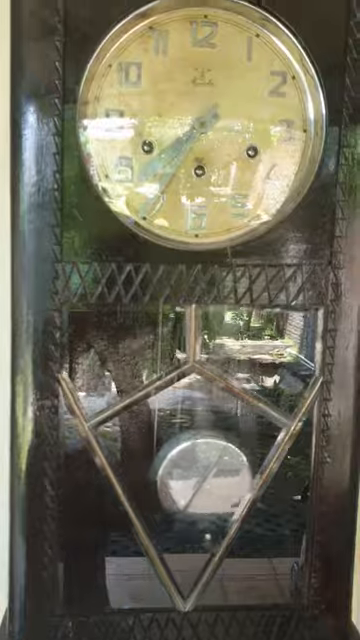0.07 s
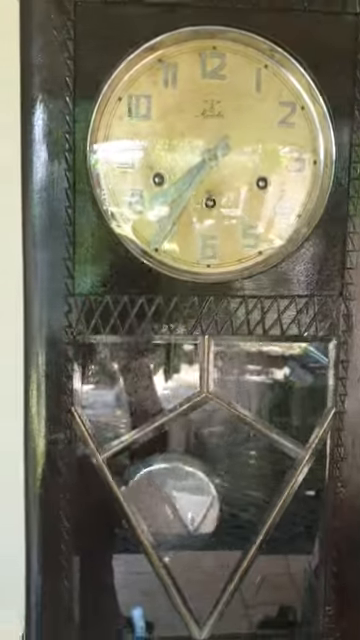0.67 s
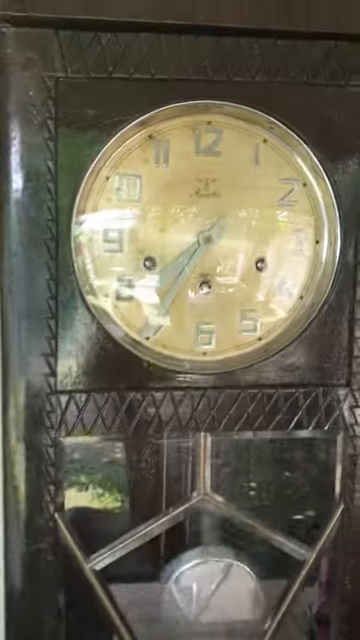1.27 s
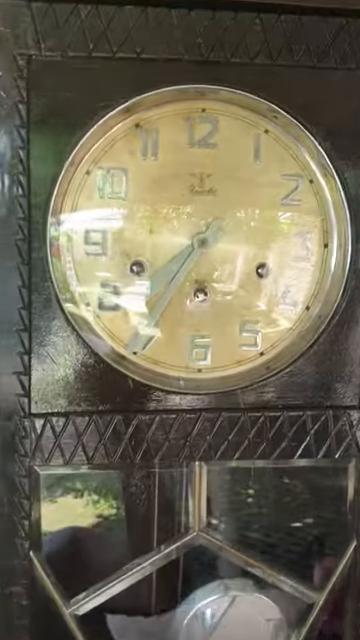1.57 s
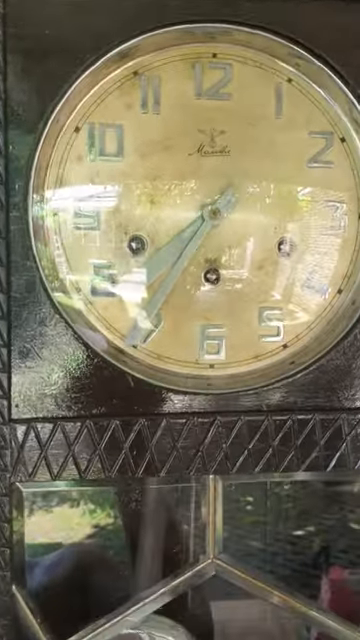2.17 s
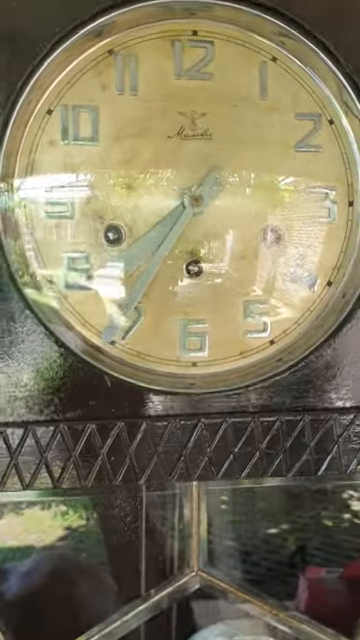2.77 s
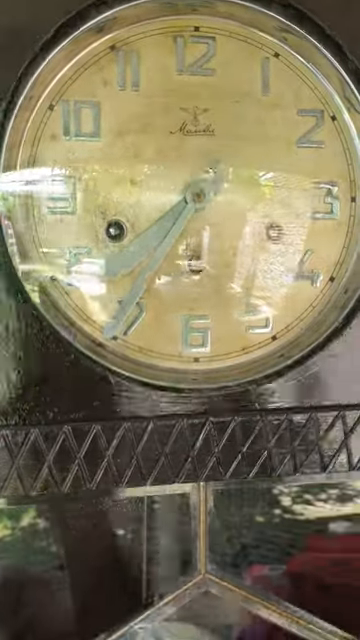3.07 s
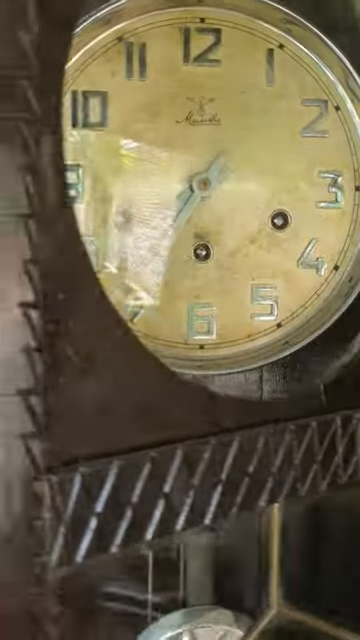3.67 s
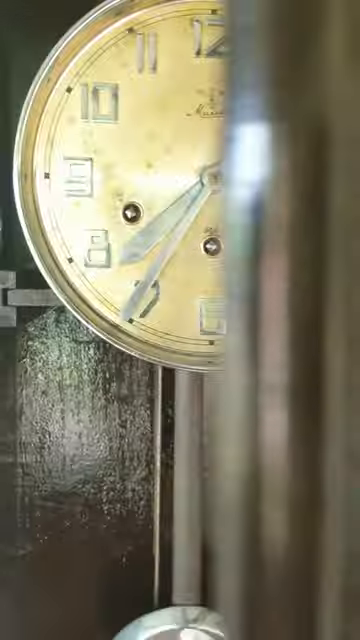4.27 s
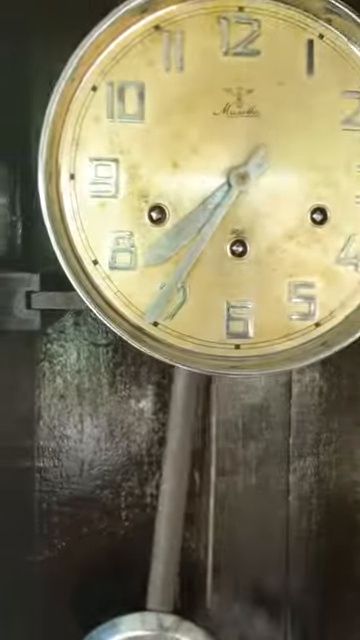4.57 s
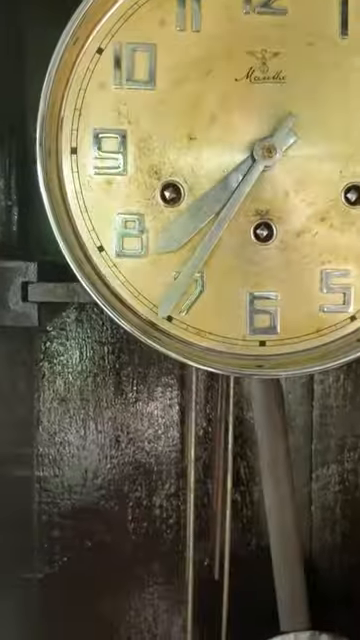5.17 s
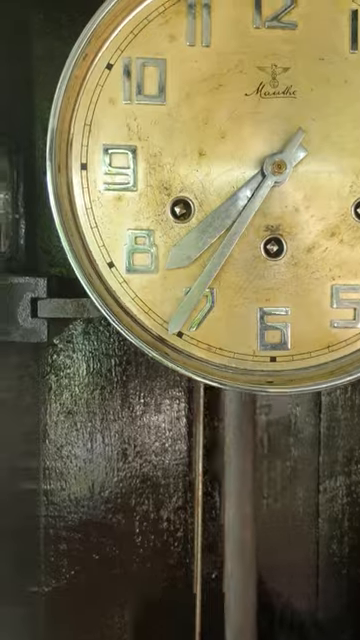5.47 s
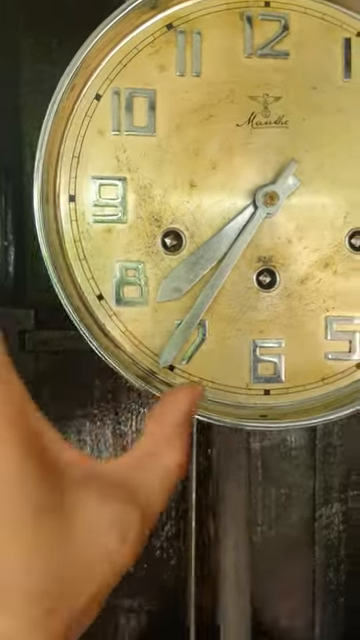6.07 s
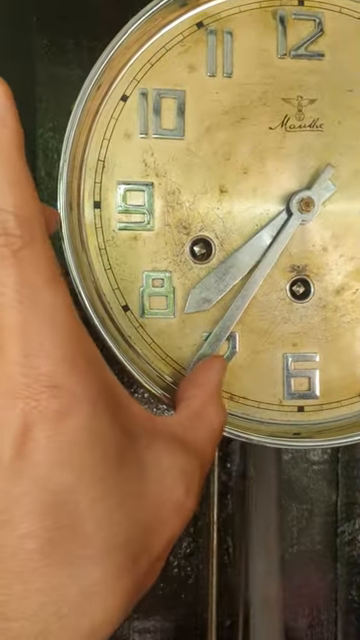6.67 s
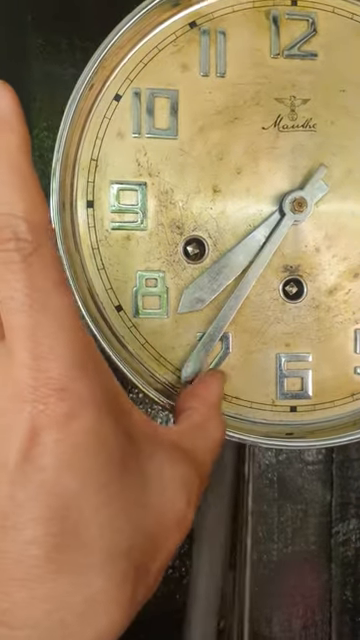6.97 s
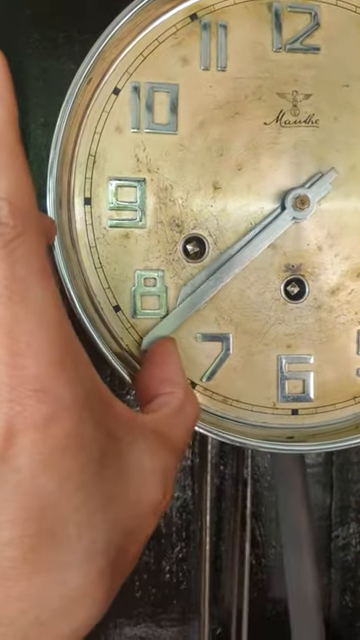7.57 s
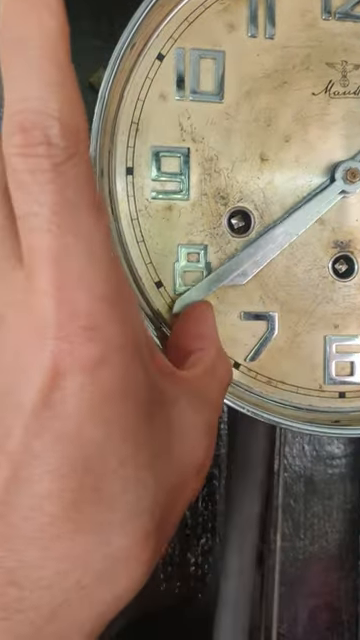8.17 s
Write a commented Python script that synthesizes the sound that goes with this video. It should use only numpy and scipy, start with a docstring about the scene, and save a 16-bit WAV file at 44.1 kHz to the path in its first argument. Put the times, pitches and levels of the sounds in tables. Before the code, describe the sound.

A wooden pendulum wall clock ticks close by throughout, about one beat every 0.6 seconds, alternating tick and tock with a short brassy ring. Beneath it lie a quiet room's low rumble, hum, hiss and a few very faint squeaks. At first the ticks are soft and muffled by the shut case, with small handling clicks and a light brush around 0.6 to 1.2 seconds. From 2.5 to 3.2 seconds the tight glass door is tugged, its wood juddering, scraping and groaning slightly upward in pitch. At about 3.5 seconds it springs free with a quick rattling clack, the loudest sound. From 4 seconds the ticks are open, clearer and louder. From about 7 seconds a hand softly brushes the dial and the case rumbles faintly; a strong tick near 7.5 seconds leaves a thin metallic ring. Ticking and soft rubs continue until about 8.4 seconds.

```python
"""Wooden pendulum wall clock

The escapement ticks in a quiet room, over low rumble, hum, hiss and faint squeaks. The tight glass door
is pulled, sticks and slips along its frame and springs free with a rattling clack; the muffled ticks
then sound open and clear. A hand brushes the dial and pushes the minute hand: the case rumbles and the
loaded wheel train rings."""
import sys
import numpy as np
from scipy import signal
from scipy.fft import rfft, irfft, next_fast_len
from scipy.io import wavfile
from scipy.ndimage import map_coordinates

SR = 44100
rng = np.random.default_rng(int(sys.argv[2]) if len(sys.argv) > 2 else 0)


def int16_out(signal):
    """Quantize to a 16-bit WAV file."""
    q = np.round(np.clip(np.atleast_2d(signal).T, -1, 1) * 32767)
    wavfile.write(sys.argv[1], SR, q.astype(np.int16))


N = 370881
TIME_S = np.arange(N) / SR
EVENT_N = SR * 3 // 4
EVENT_S = np.arange(EVENT_N) / SR
OPEN_S, CROSS_S = 4.1, 6.5  # door stands open; microphone crosses in front of the movement
TICK_PAN_DB = 2.5


def amp(db):
    return 10 ** (np.asarray(db) / 20)


def unit_rms(x):
    return x / np.sqrt(np.mean(x ** 2) + 1e-20)


def along(points, hz):
    """Interpolate (Hz, value) points on a log frequency axis."""
    knots_hz, values = np.transpose(points)
    return np.interp(np.log(hz + 1), np.log(knots_hz + 1), values)


def filtered(x, response):
    """Apply a gain given as a function of Hz."""
    n = x.shape[-1]
    padded = next_fast_len(n + 8192)
    return irfft(rfft(x, padded) * response(np.fft.rfftfreq(padded, 1 / SR)), padded)[..., :n]


def panned(db):
    """Stereo gains for a left-minus-right level."""
    return amp(np.array([[.5], [-.5]]) * db)


def placed(x, pan_db, lead_s):
    """Off-centre source: the left leads by about lead_s in the treble; bass leaves the case at once."""
    def response(hz):
        delay_s = lead_s * along([(600, 0.072), (1300, 0.94)], hz)
        return panned(pan_db(hz)) * np.exp(np.array([[1j], [-1j]]) * np.pi * hz * delay_s)
    return filtered(x, response)


def wobble(rate_hz):
    """Smooth random curve."""
    knots = rng.standard_normal(int(N * rate_hz / SR) + 4)
    return map_coordinates(knots, [TIME_S * rate_hz])


# Left-right likeness: (frequency [Hz], correlation [ratio])
COHERENCE = [(60, 0.9), (250, 0.89), (600, 0.57), (2000, 0.07), (10000, 0.44)]


def noise(spectrum, size=EVENT_N):
    """Coloured stereo noise of rms 1, near mono in the bass."""
    def colour(hz):
        angle = np.arccos(np.clip(along(COHERENCE, hz), -1, 1)) / 2
        return amp(along(spectrum, hz)) * np.array([np.cos(angle), np.sin(angle)])
    mid, side = filtered(rng.standard_normal((2, size)), colour)
    return unit_rms(np.array([mid + side, mid - side]))


def band(hz, octaves, size=EVENT_N):
    """Noise in one resonance, 14 dB down at +/- octaves."""
    skirt = [(-4, -60), (-1, -14), (0, 0), (1, -14), (4, -60)]
    return noise([(hz * 2 ** (step * octaves), db) for step, db in skirt], size)


def fade(t60_s):
    return amp(-60 * EVENT_S / t60_s)


def attack(rise_s):
    return 1 - np.exp(-EVENT_S / rise_s)


def ring(hz, db, t60_s, scatter_db, spread_rad, twin_db, split_hz):
    """Damped modes, each beating with a weak twin; higher ones differ more in phase left to right."""
    gains = amp(db + scatter_db * rng.standard_normal(len(hz)))
    phase = spread_rad * np.minimum(hz / 1500, 1) * rng.standard_normal((2, len(hz)))
    twin_hz = hz + split_hz * np.sqrt(hz / 1000) * rng.standard_normal(len(hz))
    modes = np.exp(2j * np.pi * hz[:, None] * EVENT_S)
    twins = 1j * amp(twin_db) * np.exp(2j * np.pi * twin_hz[:, None] * EVENT_S)
    waves = (modes + twins) * np.array([fade(t) for t in t60_s])
    return ((gains * np.exp(1j * phase)) @ waves).imag / np.sqrt(np.sum(gains ** 2) / 2)


def add(track, start_s, sound):
    start = max(round(start_s * SR), 0)
    part = track[:, start:start + sound.shape[-1]]
    part += sound[:, :part.shape[-1]]


# Room decay: (frequency [Hz], t60 [s])
ROOM_DECAY = [(120, 1), (400, 0.37), (1400, 0.43), (5000, 0.4), (12000, 0.3)]


def in_room(x, wet_db):
    """Add a diffuse tail, longest in the bass."""
    hz, t, bins = signal.stft(rng.standard_normal((2, EVENT_N)), SR, nperseg=256)
    decay = amp(-60 * t / along(ROOM_DECAY, hz)[:, None])
    tail = signal.istft(bins * decay, SR, nperseg=256)[1]
    wet = signal.fftconvolve(x, tail / np.linalg.norm(tail[0]), axes=1)
    return x + amp(wet_db) * wet[:, :x.shape[-1]]


# Room floor, low room resonance, microphone hiss: (frequency [Hz], density [dB])
AIR_SPECTRUM = [(20, -31), (60, -11), (120, 0), (200, -2), (330, -5), (480, -6.5), (620, -17.5),
                (1000, -22), (1600, -36), (5000, -45), (15000, -46)]
BOOM_SPECTRUM = [(20, -41), (38, -16), (60, -0.5), (80, -3.5), (100, -9), (200, -39), (600, -79.5)]
HISS_SPECTRUM = [(600, -4.5), (1500, 5), (4000, -0.5), (6800, 1.5), (8400, -13), (11000, 0.5), (14500, -3)]


def room_tone(air_db=-68, rumble_db=-66, hum_db=-72.5, hum_hz=299.8, hiss_db=-77):
    """Randomly swelling rumble, wavering hum and steady hiss."""
    drift_db = wobble(1.5) + wobble(5)
    air = amp(air_db + drift_db) * noise(AIR_SPECTRUM, N)
    rumble = amp(rumble_db + 3 * wobble(4)) * noise(BOOM_SPECTRUM, N)
    hum_rms = amp(hum_db + 2.5 * wobble(5))
    hum = hum_rms * np.sqrt(2) * np.sin(2 * np.pi * hum_hz * TIME_S + .4 * wobble(5))
    hiss = unit_rms(filtered(rng.standard_normal((2, N)), lambda hz: amp(along(HISS_SPECTRUM, hz))))
    pan_db = np.interp(TIME_S, [OPEN_S, CROSS_S], [7.5, 6.5])  # microphone nears the dial
    return (air + rumble + hum) * panned(pan_db) + amp(hiss_db) * hiss * panned(1.5)


# Beats, uneven from tooth to tooth: (time [s], level [dB], treble [dB])
PALLET_BEATS = [(0.159, -48.5, -6), (0.758, -57, 8), (1.376, -49, 3.5), (1.975, -54.5, 5.5),
                (2.599, -45, -5), (3.197, -42.5, 0), (3.816, -39.5, 2.5), (4.419, -43.5, -3),
                (5.047, -36, -6), (5.613, -42.5, 3), (6.247, -37, -2.5), (6.839, -41.5, 4),
                (7.466, -33, 6.5), (8.062, -41, 2)]
# Brass movement: (frequency [Hz], first pallet [dB], second pallet [dB], t60 [s])
MOVEMENT_MODES = [(478, -11, -5, 0.275), (592, -11, -8, 0.3), (855, -3.5, -15, 0.18),
                  (924, -1.5, -24, 0.17), (962, -4.5, -2.5, 0.2), (989, 0.5, -4, 0.2),
                  (1110, -5, -7.5, 0.3), (1179, -8, -7, 0.35), (1200, -5, -11, .24), (1310, -10, -24, 0.17),
                  (1388, 8, -22, 0.041), (1437, -16, 0.5, 0.22), (1700, -2.5, -7, 0.31),
                  (1758, -1.5, 1.5, 0.24), (1835, -4, -7.5, 0.22), (1953, -3, -19, 0.087),
                  (2117, -1.5, -9.5, 0.24), (2360, -26, -7.5, 0.37), (2624, -5, -14.5, 0.19),
                  (2690, -9, -14, 0.23), (2790, -16, -18, 0.23), (3203, -14, -14, 0.28),
                  (3350, -24, -15, 0.082), (3740, -16, -5, 0.13), (3825, -11, 2, 0.18),
                  (3880, -8, -4.5, 0.18), (4970, -3, -2.5, 0.077), (5000, -15, -7, 0.11),
                  (5380, -28, -8, 0.055), (6970, -7, -8.5, 0.1)]
# Dense case ring under each pallet: (frequency [Hz], density [dB])
TICK_SPECTRUM = [(240, -67), (400, -32), (567, 2), (768, -14.5), (979, 4), (1070, -5.5), (1690, -3),
                 (2290, -11), (3290, -7.5), (4600, -22), (4960, -18.5), (8430, -30), (11100, -25.5),
                 (15000, -35)]
TOCK_SPECTRUM = [(240, -46.5), (400, -13.5), (584, -2), (745, -20), (979, -8), (1290, -15.5), (1470, -15),
                 (1910, -10.5), (2510, -14), (3050, -25), (3830, -9), (4260, -30), (5430, -14),
                 (15000, -75)]
# Treble shelf: (frequency [Hz], share of treble gain [ratio])
TREBLE_SHELF = [(1800, 0.18), (6000, 1)]
# Boxy colour of the shut case: (frequency [Hz], gain [dB])
SHUT_RESPONSE = [(1200, -2), (1880, 2), (2450, -1.5), (3100, -5.5), (3900, -7.5), (4900, -2.5)]


def escapement(hold_s=0.018, case_t60_s=0.054, brass_db=-7, case_db=-14, snap_db=-13, shut_treble_db=-7):
    """The wheel drops on each pallet in turn, ringing movement and case; the shut door dulls it."""
    out = np.zeros((2, N))
    hz, first_db, second_db, t60_s = np.transpose(MOVEMENT_MODES)
    case_envelope = np.minimum(1, fade(case_t60_s) * amp(60 * hold_s / case_t60_s)) * attack(0.0011)
    for k, (start_s, db, treble_db) in enumerate(PALLET_BEATS):
        modes_db, spectrum = (second_db, TOCK_SPECTRUM) if k % 2 else (first_db, TICK_SPECTRUM)
        brass = ring(hz, modes_db, t60_s, scatter_db=1, spread_rad=.6, twin_db=-11, split_hz=10)
        case = in_room(noise(spectrum) * case_envelope, wet_db=-6.5)
        snap = band(hz=3000, octaves=1.13) * fade(0.0093)  # tooth meets steel
        beat = amp(brass_db) * brass * attack(0.0069) + amp(case_db) * case + amp(snap_db) * snap
        shut = start_s < OPEN_S
        shelf_db = treble_db + shut * shut_treble_db
        beat = filtered(beat, lambda f: amp(shelf_db * along(TREBLE_SHELF, f)
                                            + shut * along(SHUT_RESPONSE, f)))
        lead_s = -.00027 if start_s < CROSS_S else .00016
        add(out, start_s, amp(db) * placed(beat, lambda f: TICK_PAN_DB, lead_s))
    return out


# Squeaks: (centre [s], half-length [s], frequency [Hz], half-width [oct], level [dB])
FAINT_SQUEAKS = [(.33, 0.044, 6500, 0.064, -76.5), (0.929, 0.21, 3960, 0.13, -81.5),
                 (1.633, 0.14, 2390, 0.48, -78), (3.451, 0.14, 1080, 0.37, -68.5),
                 (4.633, 0.055, 1100, 0.16, -69), (4.675, 0.027, 1075, 0.18, -57.5),
                 (4.657, .08, 3770, .08, -79), (4.805, 0.086, 1935, 0.054, -79),
                 (5.466, 0.11, 3180, 0.054, -78.5), (5.753, 0.3, 6320, 0.033, -83),
                 (6.613, 0.21, 6230, 0.097, -78), (7.14, 0.16, 3190, 0.052, -81),
                 (7.338, 0.26, 6130, 0.12, -78), (7.366, .16, 3110, 0.06, -78)]


def squeaks():
    """Faint squeaks and far-off chirps: narrow noise bands that swell and fade."""
    out = np.zeros((2, N))
    for centre_s, half_s, hz, octaves, db in FAINT_SQUEAKS:
        swell = np.hanning(int(2 * half_s * SR)) ** 2
        add(out, centre_s - half_s, amp(db) * band(hz, octaves, len(swell)) * swell)
    return out


# Hand strokes: (time [s], length [s], swish [dB], thud [dB])
HAND_STROKES = [(0.845, 0.43, -78.5, -59.5), (1.013, 0.22, -65, -67.5), (4.802, 0.79, -95, -66),
                (6.886, 0.22, -66.5, -70), (7.726, 0.23, -63.5, -61), (8.159, 0.23, -60.5, -61),
                (8.23, 0.46, -83, -54)]
# Handling clicks: (time [s], level [dB], frequency [Hz], half-width [oct], t60 [s])
HAND_CLICKS = [(0.638, -56, 597, 1.2, 0.045), (0.653, -52, 2134, 0.87, 0.019),
               (3.327, -57, 2179, 0.41, 0.2), (5.341, -72.5, 5960, 2.24, 0.17)]
# Sliding skin, juddering wood panel: (frequency [Hz], density [dB])
SKIN_SPECTRUM = [(290, -49), (500, -0.5), (1390, -12), (1770, -7.5), (3510, -19.5), (6860, -19),
                 (14000, -32.5), (15000, -30)]
PANEL_SPECTRUM = [(24, -41.5), (40, -15), (65, -20), (96, -13), (146, 0), (247, -2.5), (285, -4), (318, -4),
                  (507, -14), (564, -24), (700, -15.5), (910, -34.5), (1540, -120)]


def handling(swish_pan_db=4.5, thud_pan_db=7.5):
    """Skin brushes case and dial with a swish and a soft thud, among a few small clicks."""
    out = np.zeros((2, N))
    for start_s, length_s, swish_db, thud_db in HAND_STROKES:
        swish = amp(swish_db) * noise(SKIN_SPECTRUM) * panned(swish_pan_db)
        thud = amp(thud_db) * noise(PANEL_SPECTRUM) * panned(thud_pan_db)
        age = 4 * EVENT_S / length_s
        envelope = np.sqrt(2 * age) * np.exp(.5 - age)
        add(out, start_s, (swish + thud) * envelope)
    for start_s, db, hz, octaves, t60_s in HAND_CLICKS:
        add(out, start_s, amp(db) * band(hz, octaves) * fade(t60_s))
    return out


# Pulls on the door: (time [s], length [s], swell [dB], judder [dB], scrape [dB], rasp [dB], groan [dB])
DOOR_PULLS = [(2.51, 0.052, 3.5, -53, -67, -78.5, -51.5), (2.597, 0.092, -4.5, -55.5, -70, -79, -68),
              (2.716, 0.18, -2.5, -51, -57, -65.5, -60), (2.789, 0.077, -1.5, -51, -61, -85, -52.5),
              (2.914, 0.017, 0, -48, -60.5, -84, -54), (2.958, 0.17, 9, -51.5, -56.5, -61, -57)]


def pull_gain(levels_db, effort_power=1, grip_s=0.024, release_db_per_s=174.5):
    """Envelope of one layer: each pull grips, swells or eases as the door slides, then lets go."""
    gain = np.zeros(N)
    for (start_s, length_s, swell_db, *_), db in zip(DOOR_PULLS, levels_db):
        t = np.maximum(TIME_S - start_s, 0)
        effort_db = swell_db * np.minimum(t / length_s, 1)
        effort_db -= release_db_per_s * np.maximum(t - length_s, 0)
        gain = np.hypot(gain, amp(db + effort_power * effort_db) * np.minimum(t / grip_s, 1))
    return gain


# Rubbing door edge: (frequency [Hz], level [dB], t60 [s])
EDGE_MODES = [(1370, -2.5, 0.049), (1743, -7, .025), (2250, -2.5, 0.025), (2560, 0, 0.03)]
# Scraping wood, dry varnish: (frequency [Hz], density [dB])
SCRAPE_SPECTRUM = [(290, -27.5), (500, 2), (568, -9.5), (637, -0.5), (1170, -9), (1330, -16), (1630, -5.5),
                   (3460, -8), (4600, -20), (7060, -16.5), (8990, -32), (11300, -20), (15000, -40)]
VARNISH_SPECTRUM = [(1800, -29.5), (3100, -6), (3430, 2), (3650, -4), (4500, -5), (5500, -2.5), (6900, -4),
                    (8600, -22), (11300, -12), (14500, -16.5)]


def door_drag(slips_per_s=650, edge_db=-3, rough_db=2.7):
    """Wood sticks and slips: the panel judders and booms, slips scrape and ring the edge, varnish rasps."""
    *_, judder_db, scrape_db, rasp_db, _ = np.transpose(DOOR_PULLS)
    slips = (rng.random(N) < slips_per_s / SR) * rng.uniform(-1.13, 1, N)

    def struck(body):
        return unit_rms(signal.fftconvolve(slips[None], body, axes=1)[:, :N])

    edge = ring(*np.transpose(EDGE_MODES), scatter_db=1, spread_rad=1, twin_db=-6, split_hz=60)
    grains = struck(noise(SCRAPE_SPECTRUM) * fade(0.014))
    scrape = unit_rms(noise(SCRAPE_SPECTRUM, N) + grains + amp(edge_db) * struck(edge))
    panel = amp(0.5) * noise(PANEL_SPECTRUM, N) + amp(-12) * noise(BOOM_SPECTRUM, N)
    rasp = unit_rms(noise(VARNISH_SPECTRUM, N) * amp(rough_db * wobble(90)))
    return (pull_gain(judder_db) * panel
            + pull_gain(scrape_db, effort_power=1.36) * scrape
            + pull_gain(rasp_db) * rasp)


def door_groan(slack_hz=155.1, taut_hz=261.7, waver_hz=7, rough_db=2):
    """The sticking panel shudders at a pitch that climbs with the strain, first pull to last."""
    start_s, length_s, *_, groan_db = np.transpose(DOOR_PULLS)
    strain = np.interp(TIME_S, [start_s[0], start_s[-1] + length_s[-1]], [0, 1]) ** 2.5
    pitch_hz = slack_hz + (taut_hz - slack_hz) * strain + waver_hz * wobble(60)
    tone = np.sqrt(2) * np.sin(2 * np.pi * np.cumsum(pitch_hz) / SR)
    return pull_gain(groan_db) * amp(rough_db * wobble(59)) * tone


# Blows of door and catch: (time [s], level [dB], wood [dB], metal [dB])
DOOR_BLOWS = [(3.505, -21, -6.5, 5), (3.508, -18, -3.5, 0), (3.548, -12.5, -2.5, -1.5),
              (3.5565, -12, -2.5, -7), (3.56, -13, -4, -11), (3.6105, -17.5, -9.5, 1),
              (3.622, -20.5, -1, -1.5)]
# Door with pane, steel catch: (frequency [Hz], level [dB], t60 [s])
DOOR_MODES = [(124, -21, 0.85), (260.8, -13, .36), (310, -11, 0.4), (490.4, 3, 0.33), (768.5, -6.5, 0.42),
              (783, -12.5, 0.26), (858, -9.5, 0.18), (956, -6.5, .18), (1025, -11, .22),
              (1142.5, -12.5, 0.25), (1276, -6, .22), (1280, -10, 0.33), (1367, -7.5, 0.22),
              (1397, -11.5, .34), (1516, -9.5, .16), (1760, -10.5, 0.21), (2140, -14, 0.29),
              (2220, -14, .36), (2400, -13.5, 0.23), (2595, -16, 0.3), (2820, -16, 0.25),
              (3470, -14.5, 0.31)]
CATCH_MODES = [(1885, -1, .1), (2020, 1.5, 0.079), (2480, -2, 0.082), (2580, -3.5, 0.06), (3320, -4, 0.11)]
# Woody burst, steely crack: (frequency [Hz], density [dB])
BURST_SPECTRUM = [(50, -34), (80, -23), (160, -25.5), (270, -12), (400, -13.5), (490, -7.5), (600, -16.5),
                  (920, -7.5), (1300, -12.5), (2400, -13.5), (3400, -19), (8500, -32.5), (15000, -40.5)]
CRACK_SPECTRUM = [(800, -21.5), (2500, 3.5), (4800, -11), (6400, 6), (9000, -9), (11100, 5.5), (12500, -7),
                  (15000, -1.5)]


def door_clack(burst_t60_s=0.049, crack_t60_s=0.024):
    """The catch snaps free and the pane rattles: each blow cracks, bursts and rings wood and steel."""
    out = np.zeros((2, N))
    wood_share = [(600, 0.45), (2000, 0.031)]
    for start_s, db, wood_db, metal_db in DOOR_BLOWS:
        wood = ring(*np.transpose(DOOR_MODES), scatter_db=3, spread_rad=1, twin_db=-7.5, split_hz=34)
        wood *= amp(wood_db - 13) * attack(0.003)
        burst = filtered(noise(BURST_SPECTRUM), lambda hz: amp(wood_db * along(wood_share, hz)))
        burst *= amp(-7) * fade(burst_t60_s)
        crack = amp(metal_db - 8.5) * noise(CRACK_SPECTRUM) * fade(crack_t60_s)
        steel = ring(*np.transpose(CATCH_MODES), scatter_db=1.5, spread_rad=.8, twin_db=-7, split_hz=30)
        steel *= amp(metal_db - 16)
        add(out, start_s, amp(db) * (wood + steel + in_room(burst + crack, wet_db=-5)))
    return out


def shove(start_s, db, rise_s, t60_s):
    """A shove on the case stirs the room's low resonance, which builds and dies away."""
    t = np.maximum(TIME_S - start_s, 0)
    envelope = (1 - np.exp(-t / rise_s)) * amp(-60 * t / t60_s)
    return amp(db) * noise(BOOM_SPECTRUM, N) * envelope


# Door balance: (frequency [Hz], left minus right [dB])
DOOR_PAN = [(60, 5.5), (110, 6), (200, 2), (380, 8), (690, 3.5), (1280, 4), (2360, -6.5), (4350, 5.5),
            (8030, 1.5), (14800, 2)]


def door():
    """The door drags, groans and jolts free; its free edge is on the left, so that side leads."""
    jolt = shove(DOOR_BLOWS[0][0], db=-50.5, rise_s=0.077, t60_s=0.68)
    opening = door_clack() + door_drag() + door_groan() + jolt
    return placed(opening, lambda hz: along(DOOR_PAN, hz), lead_s=.0003)


# Loaded wheel train: (frequency [Hz], level [dB], t60 [s])
TRAIN_MODES = [(1167, 1.5, 0.43), (3060, -18, 0.74), (3220, 4, 0.28), (3246, -5, 0.44)]
# First-pallet beats under load: (time [s], level [dB])
TRAIN_PINGS = [(6.253, -64), (7.469, -50)]


def wheel_train():
    """With a thumb on the minute hand, the first pallet sets off a thin ring that outlasts the tick."""
    out = np.zeros((2, N))
    for start_s, db in TRAIN_PINGS:
        tone = ring(*np.transpose(TRAIN_MODES), scatter_db=.5, spread_rad=.3, twin_db=-18, split_hz=8)
        add(out, start_s, amp(db) * tone * attack(.004))
    return out * panned(TICK_PAN_DB)


def scene():
    """Clock, door, hand and room."""
    thumb_push = shove(start_s=7.06, db=-59.5, rise_s=.06, t60_s=3.7) * panned(14.5)
    return escapement() + wheel_train() + door() + handling() + thumb_push + squeaks() + room_tone()


def record(dry):
    """Brief silence, quick fade-in and a steep low-pass."""
    cutoff_hz = 14700
    fade_in = np.interp(TIME_S, [.095, .112], [0, 1])
    return filtered(dry * fade_in, lambda hz: 1 / (1 + (hz / cutoff_hz) ** 120))


dry = scene()
out = record(dry)
int16_out(out)
```